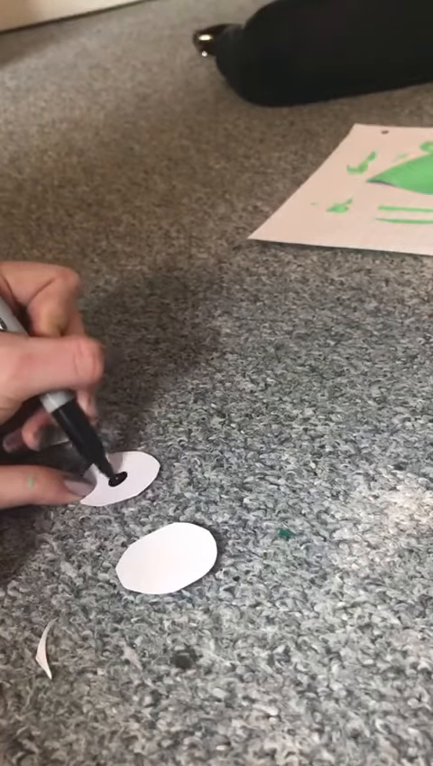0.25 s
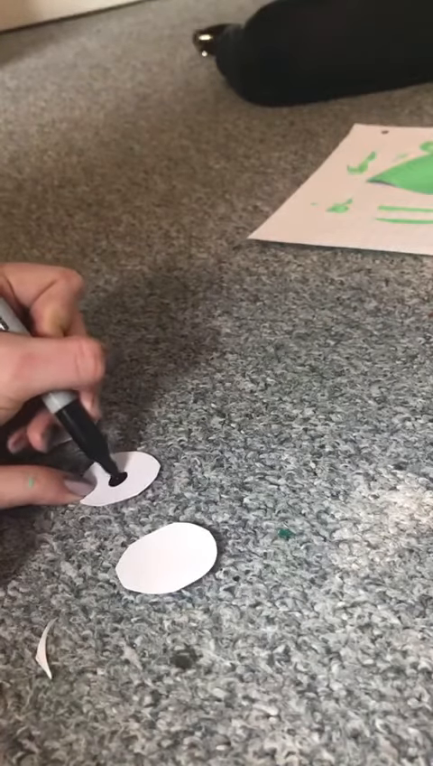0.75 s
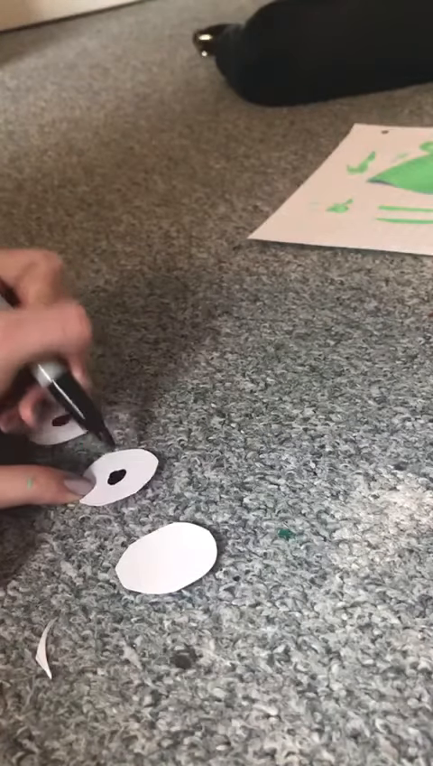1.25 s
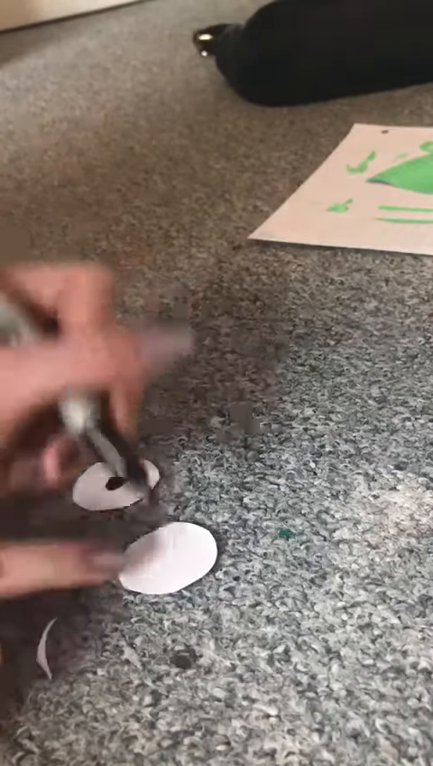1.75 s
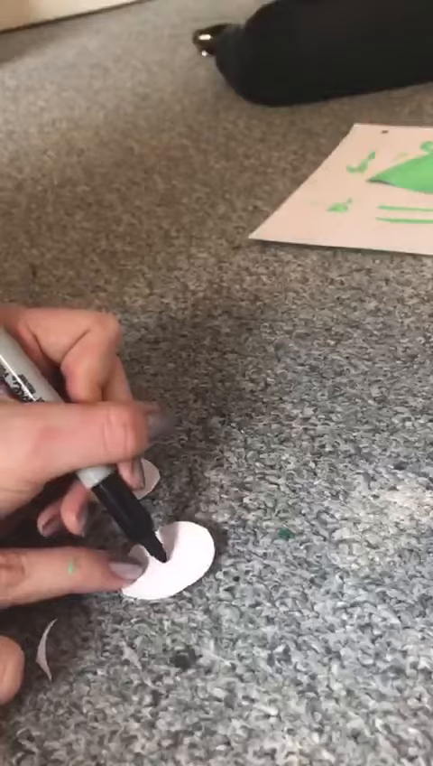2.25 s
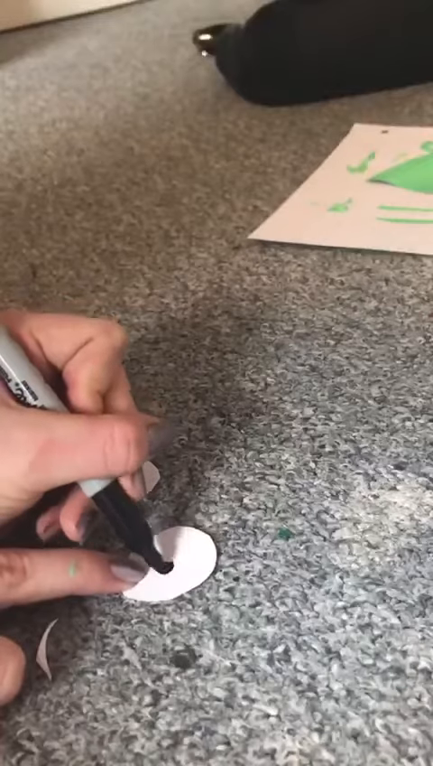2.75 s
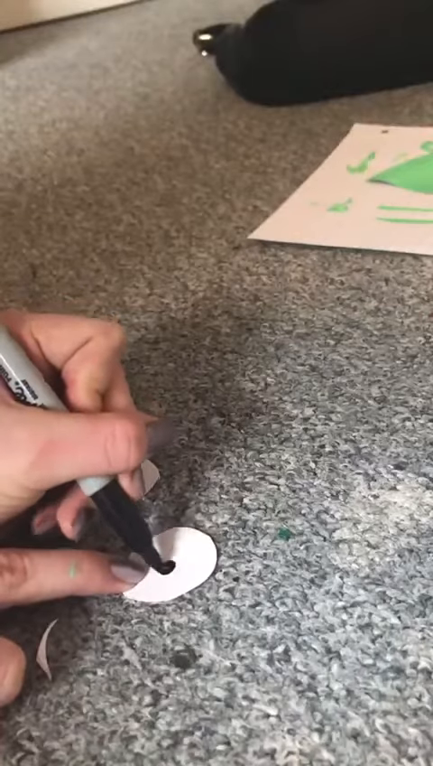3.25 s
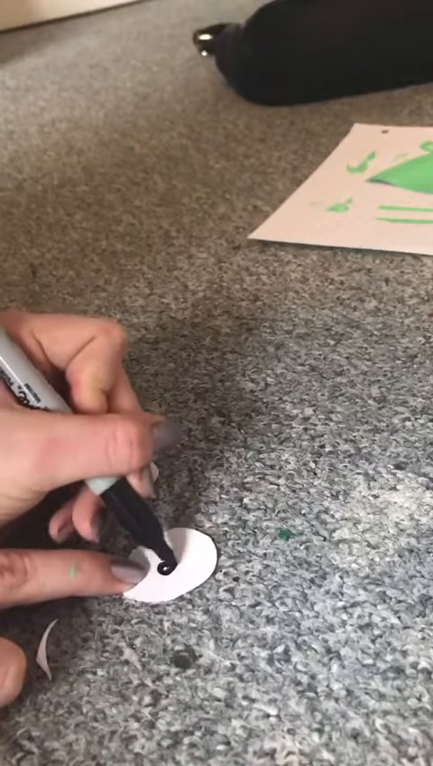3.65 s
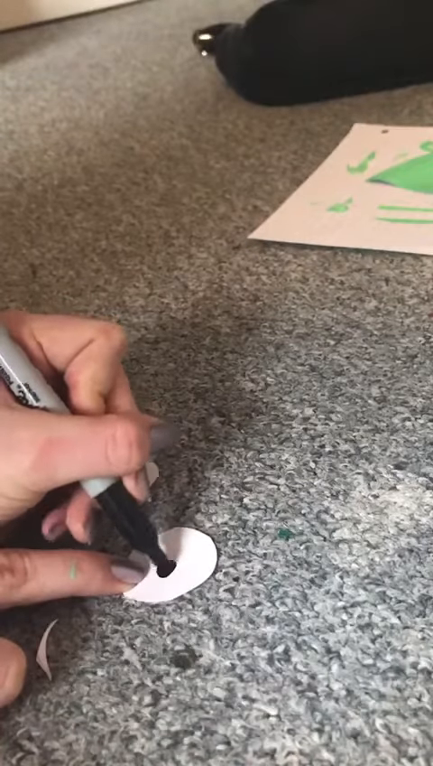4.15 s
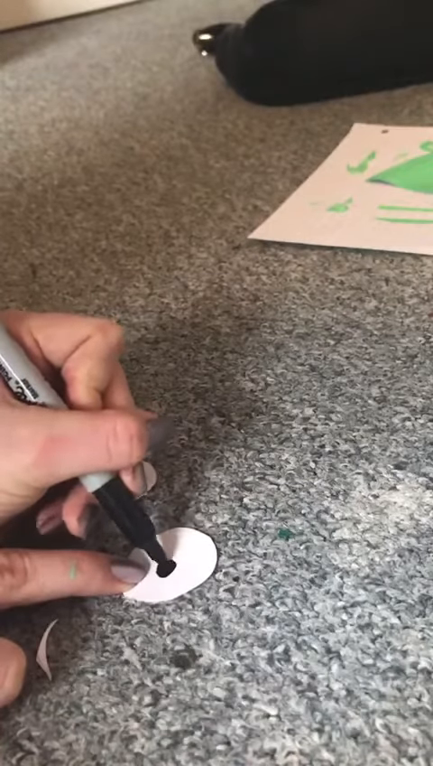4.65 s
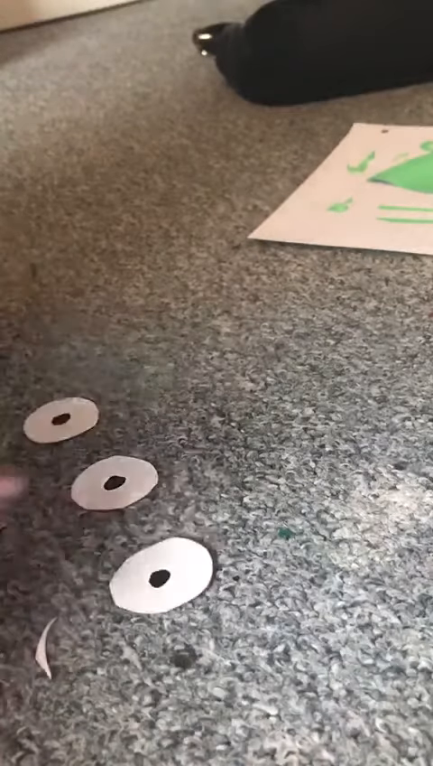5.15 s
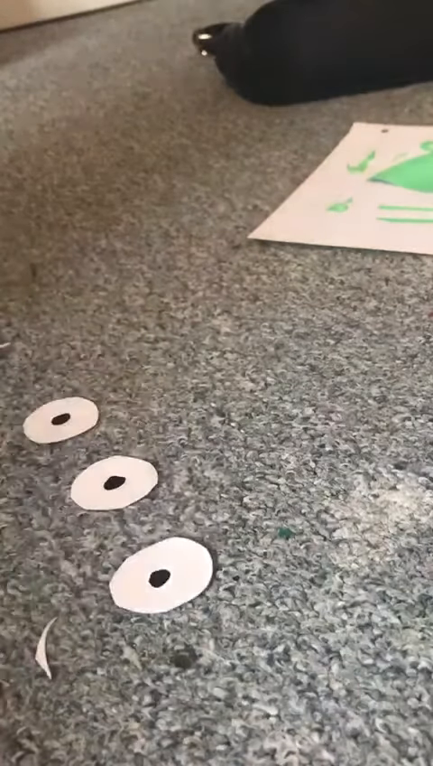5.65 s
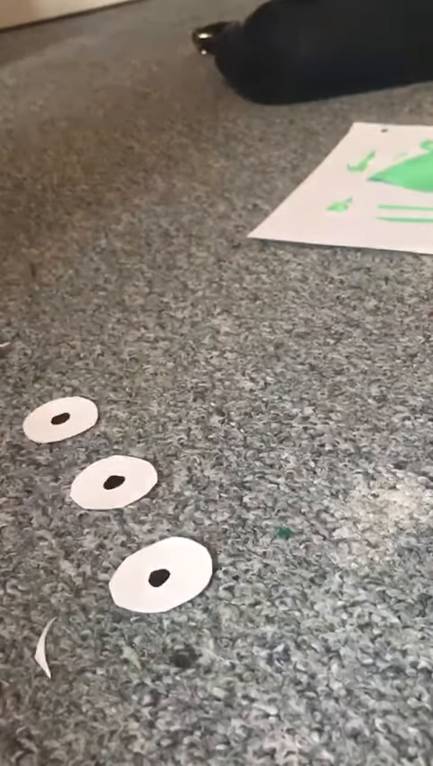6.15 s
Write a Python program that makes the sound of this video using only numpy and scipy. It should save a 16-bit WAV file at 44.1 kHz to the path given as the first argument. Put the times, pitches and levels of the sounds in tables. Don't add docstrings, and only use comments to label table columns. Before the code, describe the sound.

Indoors, very close to a phone microphone, a steady low mains hum with a soft drone and faint airy room tone runs throughout. From 0 to about 1.2 seconds a felt marker scratches dryly back and forth on a paper disc, roughly ten strokes a second, growing lighter and more broken. Fingers and sleeve rustle softly at 1.3, then faint brushes and tiny ticks fill the gap until 2.2. The tip touches down lightly and, from 2.4 to 4.7, scribbles more firmly in regular alternating strokes, about eight a second, papery and bright. A small knock comes at 3.3 and a dull low thud at 4.3. The pen lifts with ticks near 4.75; sleeve swishes follow from 4.9, with woody knocks around 5.35. The cap snaps on sharply at 5.9, with a small after-click, and firm, nearly dry finger taps on the phone land at 6.26 and 6.36.

```python
import sys
import numpy as np
from scipy import signal
from scipy.fft import rfft, irfft, next_fast_len
from scipy.io import wavfile
from scipy.ndimage import uniform_filter1d, map_coordinates

SR = 44100
rng = np.random.default_rng(int(sys.argv[2]) if len(sys.argv) > 2 else 0)


def convert_level_to_amplitude(level_db):
    exponent = np.asarray(level_db, float) / 20
    return 10 ** exponent


def generate_wav(signal):
    frames = np.transpose(np.atleast_2d(signal))
    scaled = np.clip(frames, -1, 1) * 32767
    pcm = np.round(scaled).astype(np.int16)
    wavfile.write(sys.argv[1], SR, pcm)


N = 281784

# centre in Hz, width in Hz, level in dB.
DISC_MODES = [(1234, 410, 9.5), (2170, 1500, -10)]
BARREL_MODES = [(2330, 500, -49), (3470, 860, 33), (3900, 1800, -35), (4230, 150, 10)]
FELT_MODES = [(4940, 1970, -7.5), (6830, 1500, -4.5), (8810, 740, -1), (11590, 900, -7.5),
              (10250, 330, -21.5)]

# turn in seconds, pressure in dB, heading (0 pull to 1 push), halt at the turn in dB, swell
# over the stroke in dB.
FIRST_DISC_STROKES = [(-0.062, -61, -0.32, -0.0, 3), (0.036, -59, 0.42, 0, -1.5),
                      (0.138, -61, -0.43, -1.3, -1.5), (0.251, -58, 0.46, 0.9, 0.5),
                      (0.344, -61, -0.31, 0, 0), (0.457, -60.5, 0.088, 4, -5), (0.534, -61.5, 0.88, 1, -8),
                      (0.575, -72, -1, 0, 0), (0.639, -63.5, 0.21, 0.2, -5), (0.719, -62, 0.7, 3.5, -9.5),
                      (0.773, -66.5, -0.18, 1.5, 8.5), (0.834, -61.0, 0.58, 15, -3.5),
                      (0.897, -62.4, 0.94, 7.5, -14), (0.974, -64.5, 0.32, -3.5, 10),
                      (1.002, -64, 0.57, 1.5, -6.4), (1.098, -72.5, 1.1, 24.8, -3),
                      (1.169, -70, 0.59, 5, 0)]
SECOND_RUN_STROKES = [
    (2.248, -85.5, 3.2, 10.6, -19.3),
    (2.309, -70, 1.06, 11.3, -1),
    (2.387, -65, 1.36, 1.1, 3),
    (2.437, -62.5, 0.64, 0.3, -5),
                      (2.552, -62, 1.0, -2.1, 3), (2.693, -61, 0.37, 0, 2), (2.818, -59, 0.91, -2, 6.5),
                       (2.935, -60, 0.22, 0.5, -2), (3.049, -57.5, 0.82, 3, 1.7),
                       (3.189, -60.5, 0.0, -1, 2.3), (3.3, -56.5, 0.85, 2.2, 1.5),
                       (3.425, -58.5, 0.0, 0.2, 2), (3.545, -56.5, 0.92, 1.5, 1.5),
                       (3.675, -60.5, 0.13, -1.5, 0.2), (3.791, -57.5, 0.75, 2.3, -2.3),
                       (3.918, -59.7, 0.3, -0.4, 0.5), (4.036, -57.5, 0.61, 3, 2),
                       (4.139, -60.2, 0.092, 0.3, -3), (4.251, -59, 0.29, 0.7, 2),
                       (4.349, -62.5, 0.35, -0.3, -0.5), (4.447, -61.5, 0.61, 2, -4.5),
                       (4.503, -63, 1.5, 2, 2), (4.569, -63.5, 0.34, 4.5, 8),
                       (4.646, -65.5, 1.82, 4.5, 0.5), (4.704, -92, 0.5, 10, 2)]

# share of the stroke done (0 to 1), then disc, barrel and
# felt level in dB, then disc, barrel and felt peak in Hz.
PUSH_ANSWER = [(0.0, -10, 1, -1, 1340, 3360.0, 9030), (0.15, -1.5, -3, 4.5, 1370, 3640.0, 8370),
               (0.35, -1, 4, 7.0, 1410, 3570, 8800), (0.6, 0, 5.5, 3.5, 1430, 3630, 8700),
               (0.85, -7.5, -0.5, -1.8, 1360, 3740.0, 8680)]
PULL_ANSWER = [(0.0, -8, 0, 1.7, 1480, 3860, 8640), (0.15, 1.5, -1.5, 5.9, 1450, 3960, 8810),
               (0.35, 3.5, -4.5, 4.8, 1486, 3730, 8520), (0.6, 3.5, -0.6, 0.48, 1434, 3450.0, 8870),
               (0.85, -3, 3, 0.18, 1500, 3540, 8950)]
HALT_SHARE = (1.2, 3.4, 3.9)
SWELL_SHARE = (-1.3, 1.53, 1.1)

# centre in seconds, length in seconds, finger level in dB, cloth over fingers in dB.
BRUSHES = [(1.267, .3, -73, -10), (1.292, 0.032, -66, -5.5), (1.347, .03, -69, -12),
           (1.382, 0.052, -73, -12), (1.521, .025, -72.5, -12), (1.659, .05, -72.5, -11),
           (1.75, 0.34, -77, -7), (4.76, .12, -88, -4), (1.935, 0.24, -77.5, -3), (2.2, 0.27, -89, -8),
           (4.934, 0.35, -68.5, -9), (5.15, 0.44, -71, -1.5), (5.365, 0.31, -77, 7.5),
           (5.65, 0.32, -67, -0.2), (5.834, 0.47, -71.5, 0), (6.005, 0.073, -72, 0), (6.15, .2, -89, -2),
           (6.262, 0.18, -82, 12), (6.39, 0.26, -70.5, -6)]
# frequency in Hz, density in dB per Hz.
CLOTH_SPECTRUM = [(250, -25), (380, -3.5), (900, -5.5), (1440, -7), (2500, -16), (4000, -37)]
FINGER_SPECTRUM = [(1200, -14), (2100, 1.5), (4300, 0.5), (6300, -1), (9700, -3.5), (11700, -6.5)]

# frequency in Hz, level in dB, decay t60 in seconds.
CAP_RINGS = [(1990, -1, .022), (1580, -20, 0.032), (1270, -16, 0.019)]
# time in seconds, peak in dB, crack in dB.
CAP_HITS = [
    (5.884, -53.5, -2),
    (5.892, -27.5, -19.5),
    (5.9894, -49, -9),
    (6.2334, -57, -19),
]
# time in seconds, peak in dB, ring in Hz, crack in dB.
PHONE_TAPS = [
    (6.2633, -34.5, 2035, -18),
    (6.2637, -47, 5630, -16),
    (6.2665, -42.5, 2200, -8),
    (6.3265, -53, 1980, -10),
    (6.329, -51.5, 1960, -5.5),
    (6.3616, -34.5, 1150, -25),
    (6.3625, -35.5, 2300, -26),
    (6.3666, -35.5, 2200, -13.5),
    (6.388, -64, 1500, -5),
]
# time in seconds, peak in dB, ring in Hz, crack in dB.
PEN_TICKS = [
    (1.175, -63, 4500, -8),
    (1.936, -64, 3000, -4),
    (4.751, -59.5, 3900, -1),
    (4.752, -60, 2410, -9),
    (4.826, -66, 2400, 3),
    (5.256, -64, 2500, -12),
    (4.975, -59.5, 5600, 1),
    (5.255, -57, 4560, -7),
]
# time in seconds, peak in dB, ring in Hz,
# decay t60 in seconds.
KNOCKS = [(1.445, -72, 652, 0.16), (3.302, -51.5, 587, 0.049), (3.304, -58.5, 330, 0.039),
          (5.349, -55, 590, 0.051), (5.369, -55, 580, .04), (3.303, -60, 715, .05),
          (5.351, -63, 710, 0.051), (5.364, -51, 230, 0.044), (5.394, -52, 207, 0.13),
          (5.428, -55.5, 198, 0.079), (1.2, -76, 2600, .23)]

# centre in seconds, length in seconds, rumble in dB, boom in dB.
THUDS = [
    (3.335, 0.12, -59.5, -79),
    (4.307, 0.24, -49, -58),
    (5.4, .12, -59, -72),
]
# frequency in Hz, density in dB per Hz.
BOOM_SPECTRUM = [(20, -24), (45, 19), (70, -11), (100, -27)]
RUMBLE_SPECTRUM = [(60, 3), (130, 11), (220, -7), (400, -17), (700, -36)]

# frequency in Hz, decay t60 in seconds.
ROOM_DECAY = [(300, 0.25), (2000, 0.2), (10000, 0.11)]
MAINS_HZ = 50.023
# multiple of the mains, level in dB rms.
HUM_LINES = [(2, -46), (4, -66), (8, -82.5), (12, -91.5)]
# time in seconds, width in seconds, dip in dB.
HUM_SHAKE = (4.335, 0.029, -20.5)
# frequency in Hz, density in dB per Hz.
DRONE_SPECTRUM = [(25, -35), (36, -22), (42, -6), (50, 0), (65, -2.5), (85, 0), (150, -9.5), (250, -13),
                  (400, -22), (600, -27), (900, -32.5)]
AIR_SPECTRUM = [(150, -29), (300, -8.5), (600, -11.5), (1100, -13), (2000, -17), (5000, -20.5), (9500, -23),
                (12300, -25.5)]


def marker():
    disc_lean = lambda t: (stroked(4, t) / 1430) ** 1.7
    barrel_lean = lambda t: (stroked(5, t) / 3680) ** 1.35
    felt_lean = lambda t: (stroked(6, t) / 8740) ** 2.1
    disc = rubbed(1, DISC_MODES, disc_lean, low_hz=950, bright_db=1.5, sharpen=0.18, grit_db=1.0, patchy_db=1.5)
    barrel = rubbed(2, BARREL_MODES, barrel_lean, low_hz=1800, bright_db=3.5, sharpen=0.15,
                    grit_db=0.8, patchy_db=3.0)
    felt = rubbed(3, FELT_MODES, felt_lean, low_hz=4400, bright_db=0.8, sharpen=0.26, grit_db=1.07, patchy_db=2.0)
    return convert_level_to_amplitude(0.4) * disc + convert_level_to_amplitude(0.9) * barrel + convert_level_to_amplitude(0.15) * felt


def rubbed(part, modes, lean, low_hz, bright_db, sharpen, grit_db, patchy_db):
    def colour(hz, t):
        f = hz / lean(t)
        body = 0
        for k, (centre, width, db) in enumerate(modes):
            damping = 1j * f * width
            body = body + (-1) ** k * convert_level_to_amplitude(db) * damping / (centre * centre - f * f + damping)
        firmness = np.clip(stroked(part, t) + 58, -10, 10) / 10
        small = 1 / (1 + (low_hz / hz) ** 6)
        brightness = convert_level_to_amplitude(bright_db * firmness * np.log2(hz / low_hz))
        gain = abs(body) ** (1 + sharpen * firmness) * small * brightness
        return gain / np.linalg.norm(gain, axis=0)

    slips = patchy(patchy_db, colour) * convert_level_to_amplitude(grit_db * wobble(150))
    return convert_level_to_amplitude(stroked(part, np.arange(N) / SR)) * unit(slips)


def stroked(column, t):
    first = stroke_marks(FIRST_DISC_STROKES)
    second = stroke_marks(SECOND_RUN_STROKES)

    def lifted(mark, delay):
        return np.r_[mark[0] + delay, -110, -110, -110, mark[4:]]

    marks = np.vstack([first, lifted(first[-1], .03), lifted(second[0], -.01), second, lifted(second[-1], .02)])
    return np.interp(t, np.maximum.accumulate(marks[:, 0]), marks[:, column])


def stroke_marks(strokes):
    turn, pressure_db, heading, halt_db, swell_db = np.transpose(strokes)[:, :, None, None]
    share = np.array(PUSH_ANSWER)[:, :1]
    push, pull = np.array(PUSH_ANSWER)[:, 1:], np.array(PULL_ANSWER)[:, 1:]
    marks = pull + heading * (push - pull)
    swell = swell_db * (share - .4) * SWELL_SHARE
    halt = (share == 0) * halt_db * HALT_SHARE
    marks[..., :3] += pressure_db + swell - halt
    times = turn + share * np.diff(turn, axis=0, append=0)
    last = (len(strokes) - 1) * len(share) + 1
    return np.column_stack([times.ravel(), marks.reshape(-1, 6)])[:last]


def sleeve():
    s, length, db, cloth_db = np.transpose(BRUSHES)
    cloth = swells(s, length, db + cloth_db) * rush(CLOTH_SPECTRUM, patchy_db=0.5)
    fingers = swells(s, length, db) * rush(FINGER_SPECTRUM, patchy_db=2.0)
    return cloth + fingers


def clicks():
    out = np.zeros(N + SR)
    t = np.arange(SR // 5) / SR
    rows = contacts()
    crack_band = signal.butter(3, [900, 9500], "band", fs=SR, output="sos")
    noise = signal.sosfilt(crack_band, rng.standard_normal((len(rows), len(t))))
    for (s, db, hz, t60, crack_db), hiss in zip(rows, noise):
        onset = 1 - np.exp(-(t / .0006) ** 2)
        ring = convert_level_to_amplitude(-60 * t / t60) * np.sin(2 * np.pi * hz * t) * onset
        crack = convert_level_to_amplitude(crack_db - 60 * t / 0.018) * hiss
        out[round(s * SR):][:len(t)] += convert_level_to_amplitude(db + 4.5) * (ring + crack)
    return out[:N]


def contacts():
    rows = [(*knock, -30) for knock in KNOCKS]
    for s, db, crack_db in CAP_HITS:
        for hz, level, t60 in CAP_RINGS:
            rows.append((s, db + level, hz, t60, crack_db + level))
    for small, t60 in ((PEN_TICKS, 0.014), (PHONE_TAPS, 0.0085)):
        rows += [(s, db, hz, t60, crack_db) for s, db, hz, crack_db in small]
    return rows


def thuds():
    s, length, rumble_db, boom_db = np.transpose(THUDS)
    boom = swells(s + 0.7 * length, 1.6 * length, boom_db)
    rumble = swells(s, length, rumble_db)
    return boom * rush(BOOM_SPECTRUM, patchy_db=0) + rumble * rush(RUMBLE_SPECTRUM, patchy_db=0)


def room(x):
    hz, t, z = signal.stft(rng.standard_normal(SR // 2), SR, nperseg=256)
    decay = convert_level_to_amplitude(-60 * t / along(ROOM_DECAY, hz)[:, None])
    tail = signal.istft(z * decay, SR, nperseg=256)[1]
    return signal.fftconvolve(np.pad(x, (200, 0)), tail / np.linalg.norm(tail))[:N]


def hum():
    t = np.arange(N) / SR
    lines = np.zeros(N)
    for k, db in HUM_LINES:
        level = np.sqrt(2) * convert_level_to_amplitude(db + 0.15 * k * wobble(5.9))
        lines += level * np.sin(2 * np.pi * k * MAINS_HZ * t)
    s, width, dip_db = HUM_SHAKE
    lines *= convert_level_to_amplitude(dip_db * np.exp(-((t - s) / width) ** 2))
    drone = convert_level_to_amplitude(-62.5) * rush(DRONE_SPECTRUM, patchy_db=0.96)
    air = convert_level_to_amplitude(-73) * rush(AIR_SPECTRUM, patchy_db=2.0)
    return lines + drone + air


def swells(s, length, db):
    t = np.arange(0, N / SR + .002, .002)
    bells = convert_level_to_amplitude(db - 48 * ((t[:, None] - s) / length) ** 2)
    gain = np.sqrt((bells ** 2).sum(axis=1))
    return np.interp(np.arange(N) / SR, t, gain)


def rush(spectrum, patchy_db):
    closed = [(1, -120), *spectrum, (SR / 2, -120)]
    return unit(filtered(patchy(patchy_db), lambda hz: convert_level_to_amplitude(along(closed, hz))))


def patchy(patchy_db, colour=lambda hz, t: 1):
    hz, t, z = signal.stft(rng.standard_normal(N + 512), SR, nperseg=256)
    field = uniform_filter1d(rng.standard_normal(z.shape), size=4, axis=0)
    field = uniform_filter1d(field, size=10, axis=1)
    shaped = z * convert_level_to_amplitude(patchy_db * unit(field)) * colour(hz[:, None] + 1, t)
    return signal.istft(shaped, nperseg=256)[1][:N]


def filtered(x, response):
    m = next_fast_len(N + SR // 2)
    return irfft(rfft(x, m) * response(np.fft.rfftfreq(m, 1 / SR)), m)[:N]


def wobble(rate):
    knots = rng.standard_normal(int(N * rate / SR) + 4)
    return map_coordinates(knots, [np.arange(N) * rate / SR])


def along(points, hz):
    f, v = np.transpose(points)
    return np.interp(np.log(hz + 1), np.log(f + 1), v)


def unit(x):
    return x / np.sqrt(np.mean(x ** 2) + 1e-20)


def top_gate(x):
    hz, t, z = signal.stft(x, SR, nperseg=1024)
    level_db = 10 * np.log10(np.mean(abs(z[hz > 8000]) ** 2, axis=0) + 1e-20)
    rise_db = np.clip(level_db - uniform_filter1d(level_db, size=30), -4, 4)
    edge_hz = 12030 + 95 * rise_db
    return signal.istft(z / (1 + (hz[:, None] / edge_hz) ** 300), SR, nperseg=1024)[1][:N]


def scene():
    contact = clicks()
    wet_db = np.where(np.arange(N) < 6.2 * SR, -9, -16)
    return (marker() + sleeve() + thuds() + contact + room(convert_level_to_amplitude(wet_db) * contact) + hum())[None]


def band_limit(x):
    return signal.sosfilt(signal.butter(12, 12410, fs=SR, output="sos"), x)


def record(dry):
    microphone = filtered(dry[0], lambda hz: 1 / (1 + (hz / 12300) ** 40))
    heard = top_gate(microphone)[None]
    return band_limit(heard)


dry = scene()
out = record(dry)
generate_wav(out)
```